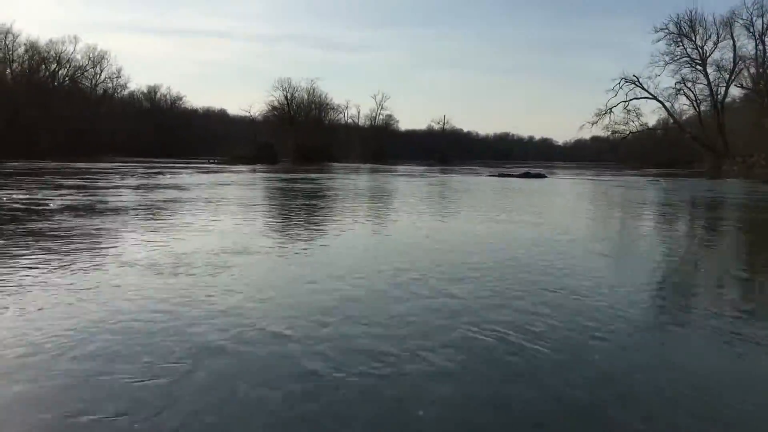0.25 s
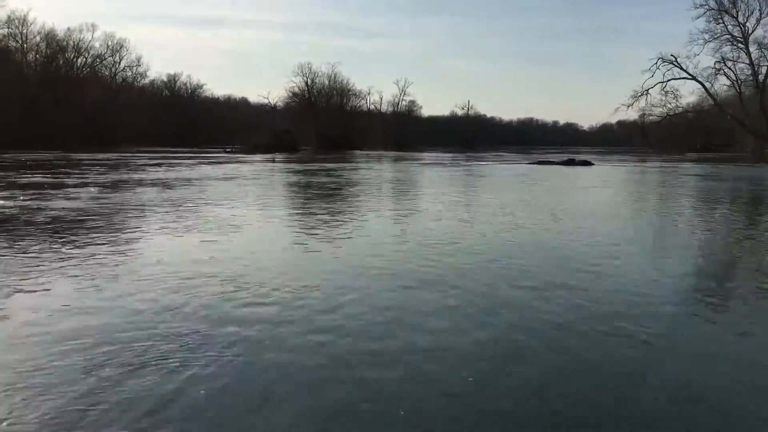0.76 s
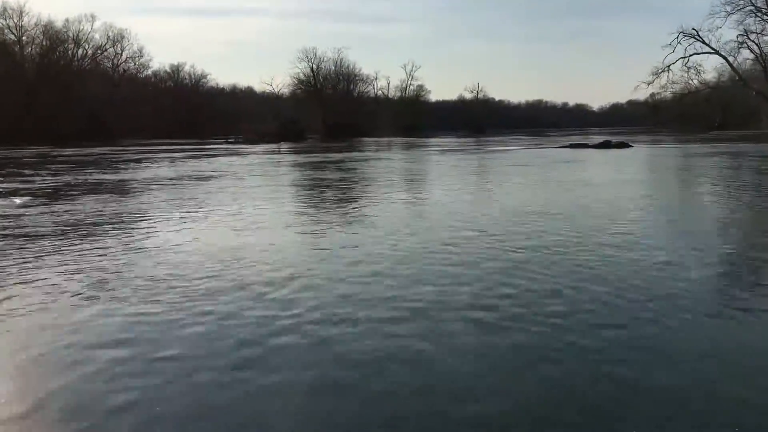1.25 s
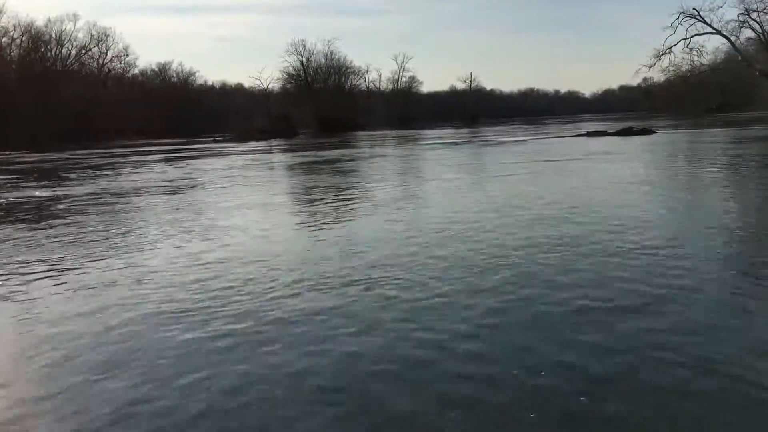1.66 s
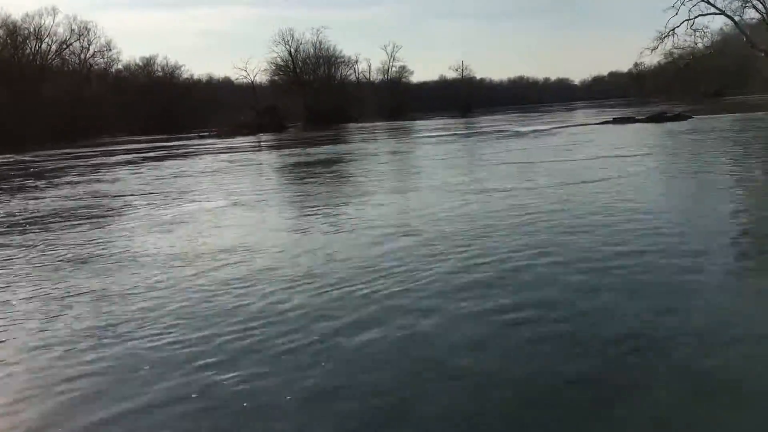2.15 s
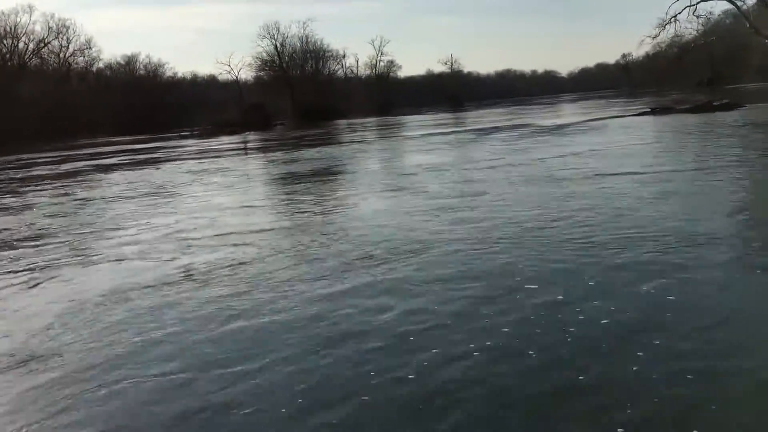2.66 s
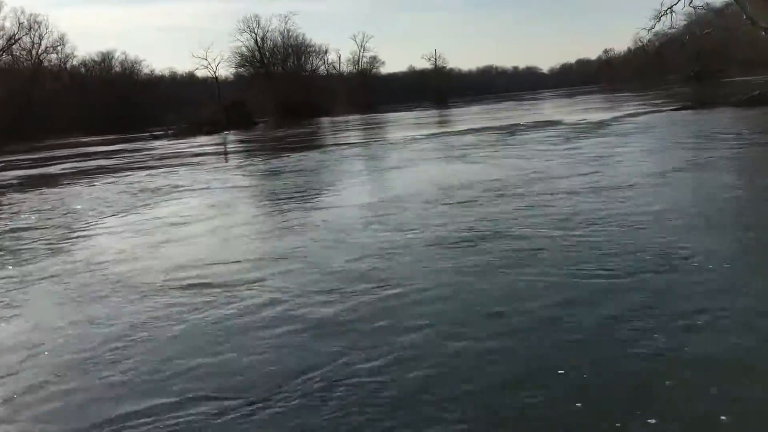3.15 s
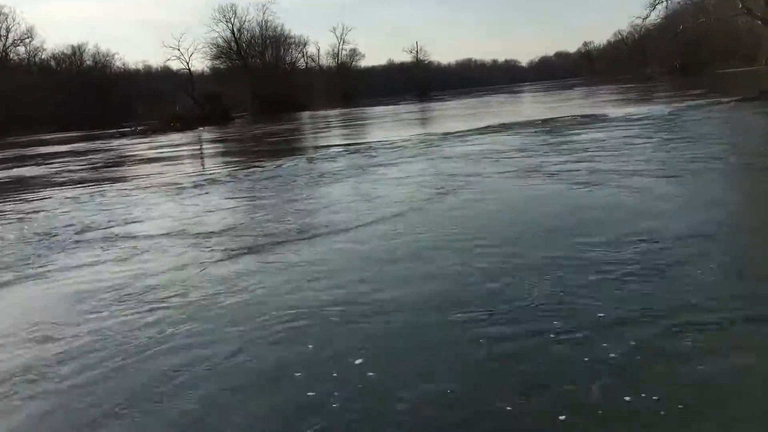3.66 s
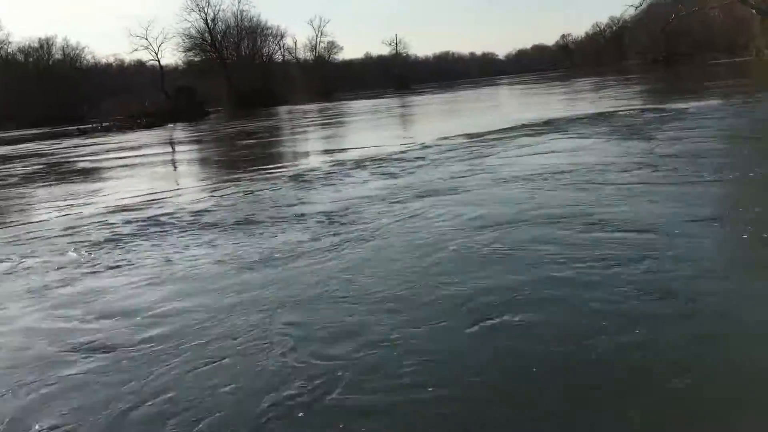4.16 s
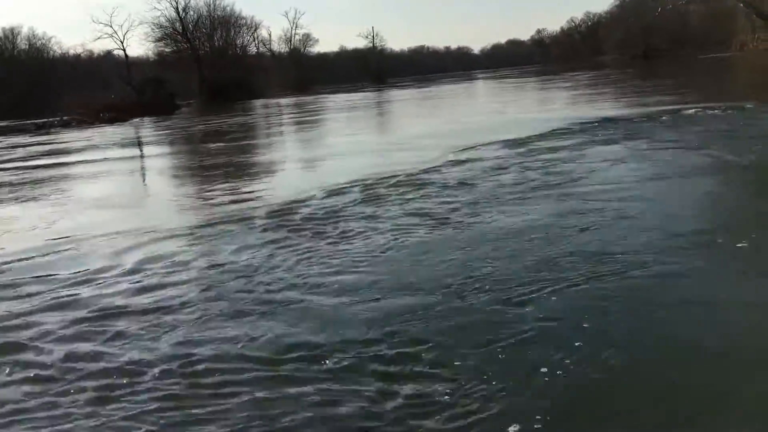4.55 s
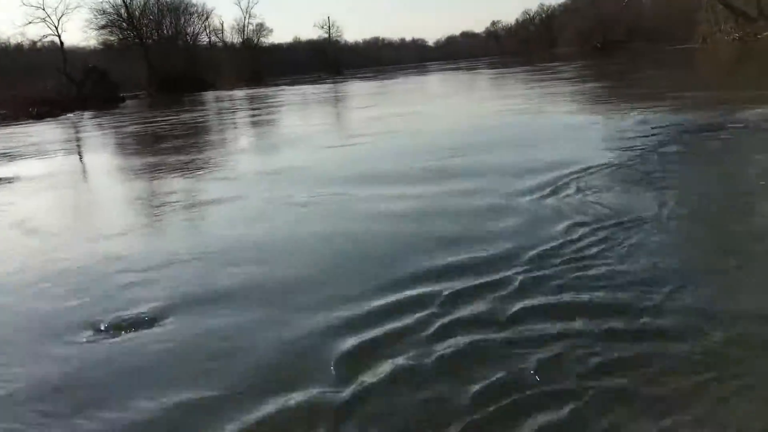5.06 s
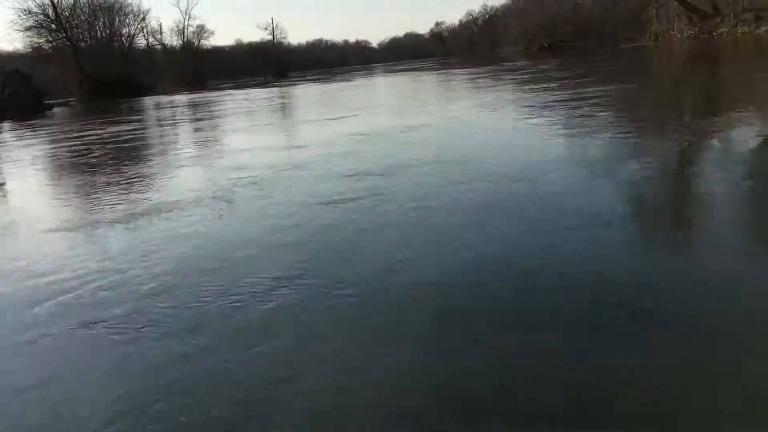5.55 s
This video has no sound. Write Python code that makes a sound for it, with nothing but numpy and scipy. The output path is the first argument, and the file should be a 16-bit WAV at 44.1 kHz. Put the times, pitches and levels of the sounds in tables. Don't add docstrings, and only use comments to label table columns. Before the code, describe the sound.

On board a jet boat cruising a calm, tree-lined river, a deep engine drone dominates throughout. At first wind rumbles on the microphone, chop knocks dully on the hull and spray hisses at its fullest. As the boat banks, the spray thins and faint engine tones swell and fade. After about five seconds the drone becomes steadier. Close, dry outdoor pick-up without echo.

```python
import sys
import numpy as np
from scipy import signal
from scipy.io import wavfile

SR = 44100
rng = np.random.default_rng(int(sys.argv[2]) if len(sys.argv) > 2 else 0)


def convert_level_to_amplitude(level_db):
    exponent = np.asarray(level_db, float) / 20
    return 10 ** exponent


def materialize(psi):
    bounded = np.clip(np.atleast_2d(psi).T, -1, 1)
    quanta = np.round(bounded * 32767).astype(np.int16)
    wavfile.write(sys.argv[1], SR, quanta)


N = 256212


def rms_one(x):
    return x / np.sqrt(np.mean(x ** 2) + 1e-20)


def in_time(rows):
    s, *columns = np.transpose(rows)
    return [np.interp(np.arange(N) / SR, s, c) for c in columns]


def swells(s, length_s, height):
    t = np.arange(0, N + 64, 64) / SR
    offset = (t[:, None] - s) / np.maximum(length_s, .005)
    bells = np.exp(-(2 * offset) ** 2) @ height
    return np.interp(np.arange(N) / SR, t, bells)


def drift(rate_hz):
    r = np.exp(-80 * np.pi * rate_hz / SR)
    coarse = rng.standard_normal(N // 40 + 2002)
    slow = signal.lfilter([1], [1, -2 * r, r * r], coarse)[2000:]
    return np.interp(np.arange(N) / 40, np.arange(len(slow)), rms_one(slow - slow.mean()))


def gusts(top_hz):
    low_pass = signal.butter(4, top_hz, fs=SR, output="sos")
    return rms_one(signal.sosfilt(low_pass, rng.standard_normal(N)))


def band_pass(x, low_hz, high_hz):
    return signal.sosfilt(signal.butter(2, [low_hz, high_hz], "band", fs=SR, output="sos"), x)


def banded_noise(spectrum, shared_db, patchy_db, rate_hz, tilt_db=0):
    hz, level_db = np.transpose(spectrum)
    edges = hz[0] * 2 ** np.arange(0, np.log2(hz[-1] / hz[0]) + .34, 1 / 3)
    out = 0
    together = drift(rate_hz)
    white = rng.standard_normal((2, N))
    for k, (low, high) in enumerate(zip(edges, edges[1:])):
        band = band_pass(white[k % 2], low, high)
        centre = np.sqrt(low * high)
        gain_db = np.interp(np.log(centre), np.log(hz), level_db) + tilt_db * np.log2(centre / 3000)
        out = out + convert_level_to_amplitude(gain_db + shared_db * together + patchy_db * drift(rate_hz)) * band
    return out


# (time [s], gustiness round the exhaust [dB], wind on the microphone [dB])
AIR = [(0, 4.5, 7), (.1, 0.5, 4.5), (.5, 2, 2), (1.0, 3, 0.5), (1.42, 6, 0), (1.6, 3, -1), (1.9, 4, -2),
       (2.0, -1, -3), (2.4, 0, 2), (2.6, -4.5, -4), (3.1, -4.5, 0.5), (3.3, -4, -1), (3.9, -2, 1),
       (4.6, -2, -2.5), (4.85, -0.5, 5), (5.5, -1.5, 4), (5.65, -3.5, -0.5), (5.81, 2, -1)]


def moving_air():
    return in_time(AIR)


# (time [s], length [s], jolt to the drone [dB], thud in the hull [dB])
CHOP = [(0.022, 0.13, 3, 15), (.22, 0.1, 4, 6), (0.398, .08, 3.5, 1), (.66, 0.3, 9, 1),
        (1.226, .12, 6.5, 1), (1.465, 0.12, 7.5, 0), (1.695, 0.046, 5, 4), (1.87, .1, 3.5, 2),
        (2.348, 0.23, 1, -3), (2.744, 0.33, 6, 5.5), (2.95, 0.11, 0, 3), (3.09, 0.11, 0, 7),
        (3.214, 0.19, 7, -3), (3.5, 0.28, 1.5, 7), (3.838, 0.087, 8.5, 9.5), (4.1, 0.1, 7, 9.5),
        (4.274, 0.17, 6, -9), (4.55, 0.18, 2.5, 3), (4.81, 0.18, 4, 6.5), (5.1, 0.055, 9, 2),
        (5.502, 0.12, 2, 4), (5.74, .06, 5, 5)]


def chop():
    s, length_s, jolt_db, thud_db = np.transpose(CHOP)
    return swells(s, length_s, jolt_db), swells(s, length_s, thud_db)


# (frequency [Hz], level [dB per Hz])
BUFFET = [(25, -18), (40, -6), (60, 5), (100, 1), (150, 5.5), (250, -6.5), (400, -15)]


def wind_buffet(wind_db):
    noise = banded_noise(BUFFET, shared_db=1.6, patchy_db=1.5, rate_hz=14.6)
    return convert_level_to_amplitude(-29.5 + wind_db) * rms_one(noise)


# (frequency [Hz], level [dB per Hz])
ROAR = [(400, -8), (480, -3), (600, 6), (750, 0.5), (950, -3), (1300, -8.5), (2000, -20.5)]
# (time [s], length [s], level [dB])
PUFFS = [
    (0.543, 0.084, 6),
    (.75, 0.045, 3),
    (0.84, .05, 6),
    (1.2, .1, -1),
    (1.69, .06, 3.5),
    (2.04, .08, 6.5),
    (2.33, 0.073, 2),
    (2.92, .08, 7),
    (3.95, 0.13, 2.5),
    (5.45, 0.17, 4),
]


def flow_roar(gust_db, jolt_db):
    level_db = -39.5 + gust_db + 0.078 * jolt_db + swells(*np.transpose(PUFFS))
    return convert_level_to_amplitude(level_db) * rms_one(banded_noise(ROAR, shared_db=1.6, patchy_db=0.9, rate_hz=12.5))


# (frequency [Hz], level [dB per Hz])
RUMBLE = [(230, -16), (290, 5.5), (350, 0.5), (420, -3.5), (520, -16)]


def hull_rumble(thud_db):
    noise = banded_noise(RUMBLE, shared_db=2.5, patchy_db=1.75, rate_hz=10.0)
    return convert_level_to_amplitude(-41.5 + thud_db) * rms_one(noise)


def upper_drone_noise(level_db, centre_hz, width_hz):
    b, a = signal.iirpeak(centre_hz, centre_hz / width_hz, fs=SR)
    once = signal.lfilter(b, a, rng.standard_normal(N))
    return convert_level_to_amplitude(level_db) * rms_one(signal.lfilter(b, a, once))


def random_sizes(spread_db):
    return convert_level_to_amplitude(spread_db * np.minimum(rng.exponential(1, N), 5)) * rng.choice([-1, 1], N)


def droplets(per_s, level_db):
    sizes = random_sizes(3.4)
    born = rng.random(N) < per_s * convert_level_to_amplitude(3.0 * drift(9)) / SR
    return convert_level_to_amplitude(level_db) * rms_one(band_pass(sizes * born, 7000, 15000))


def bubbles(per_s, level_db, cycles):
    sizes = random_sizes(2.9) * (rng.random(N) < per_s / SR)
    out = np.zeros(N)
    dealt = rng.integers(0, 40, N)
    for k, hz in enumerate(np.geomspace(450, 13000, 40)):
        r = convert_level_to_amplitude(-60 * hz / (cycles * SR))
        w = 2 * np.pi * hz / SR
        ring = signal.lfilter([np.sin(w)], [1, -2 * r * np.cos(w), r * r], sizes * (dealt == k) + 1e-18)
        out += convert_level_to_amplitude(-1.0 * np.log2(hz / 450)) * ring
    return convert_level_to_amplitude(level_db) * rms_one(out)


# (frequency [Hz], width [Hz], depth [-1 to 1])
NOTCHES = [(1510, 140, 0.16), (1674, 120, -0.35), (2900, 270, 0.31), (4890, 400, 0.37), (7630, 1060, 0.3),
           (10500, 660, 0.45)]


def reflections(x):
    for hz, width_hz, depth in NOTCHES:
        b, a = signal.iirpeak(hz, hz / width_hz, fs=SR)
        x = x - np.clip(depth, -1, 1) * signal.lfilter(b, a, x)
    return x


# (frequency [Hz], level [dB per Hz])
SPRAY = [(470, -36), (800, -4), (2910, -8.5), (4370, -11), (4890, -12), (5540, -12), (9210, -13.5),
         (10400, -15), (11800, -18), (15500, -21.5)]
# (time [s], level [dB])
WASH = [(0, 2), (.5, 2.5), (.75, 2.5), (1.05, 2), (1.25, 1.5), (1.6, 1), (2.0, -1), (2.7, -1.5), (3.3, -1),
        (3.7, -0.5), (4.8, -1), (5.15, -0.5), (5.4, -1.5), (5.7, 1.5), (5.81, 1)]
# (time [s], length [s], level [dB])
SPLASHES = [(.0, 0.02, 7.5), (.23, 0.037, 2), (0.997, 0.062, -2.5), (1.09, .03, 1.5), (1.26, .05, 1.5),
            (2.0, .04, -0.5), (2.69, .04, 1), (2.75, .03, -0.5), (2.96, .03, 1), (3.28, 0.046, -2),
            (3.573, .04, -1), (3.92, .03, -0.5), (4.11, .03, -0.5), (4.873, 0.047, -1.5), (5.09, .03, 0),
            (5.2, .04, 1.5), (5.398, .04, -0.5)]


def jet_and_spray(gust_db):
    t = np.arange(N) / SR
    wash_db = in_time(WASH)[0]
    splash_db = swells(*np.transpose(SPLASHES))
    brightening_db = .2 * (t - 2.9)
    tilt_db = 0.52 * wash_db + brightening_db - 0.12 * gust_db + 0.13 * splash_db
    hiss = rms_one(banded_noise(SPRAY, shared_db=.5, patchy_db=0.85, rate_hz=12.4, tilt_db=tilt_db))
    water = hiss + droplets(3000, level_db=-22.0) + bubbles(1500, level_db=-7, cycles=27)
    return convert_level_to_amplitude(-37 + 0.55 * wash_db + splash_db) * reflections(water)


def turbulence_level(gust_db, jolt_db):
    shelter_s, shelter_db_per_s = 5, 24
    sheltered_s = np.maximum(np.arange(N) / SR - shelter_s, 0)
    return -35 + 0.91 * gust_db + jolt_db - shelter_db_per_s * sheltered_s


# (middle time [s], length [s], multiple of the cycle rate [1], peak level [dB])
BLOOMS = [(0, 0.26, 3, -30), (.8, 0.38, 3, -43), (1.8, 0.47, 3, -34.5), (2.5, 0.97, 3, -36),
          (3.2, 0.72, 3, -31.5), (5.2, 1.2, 3, -30), (0.102, 0.72, 8, -40), (2.61, 0.74, 8, -37.5),
          (3.398, 0.58, 8, -40.5), (4.094, 0.37, 8, -40), (4.597, 0.86, 8, -45), (5.64, 0.46, 8, -38),
          (.2, 0.68, 12, -46), (1.0, 0.75, 12, -41), (2.1, 0.33, 12, -47), (3.345, 0.71, 12, -47),
          (4.3, 0.7, 12, -48.5), (5.7, .4, 12, -55), (1.3, 1.5, 16, -61), (2.35, 0.43, 16, -42),
          (5.1, .9, 16, -51.5)]


def blooms():
    s, length_s, order, peak_db = np.transpose(BLOOMS)
    order = np.round(order)
    levels = []
    for k in np.unique(order):
        height = convert_level_to_amplitude(-60) + swells(s, length_s, convert_level_to_amplitude(peak_db) * (order == k))
        levels.append((k, 20 * np.log10(height)))
    return levels


# (time [s], cycle rate [Hz])
ENGINE = [(0, 44.33), (.9, 44.29), (2.25, 44.26), (2.65, 44.13), (3.85, 44.11), (4.25, 43.98),
          (5.05, 43.89), (5.81, 43.9)]
# (multiple of the cycle rate [1], level [dB])
EXHAUST = [(2, -41.5), (6, -44.5), (7, -50), (13, -56), (14, -55.5), (15, -53), (17, -71), (24, -63),
           (28, -56.5)]
# (time [s], length [s], change of the drone [dB])
HEAVE = [(.0, 0.12, -4), (.61, 0.057, -5), (0.723, .06, -1.5), (.83, 0.076, 4), (0.888, 0.06, -2.5),
         (1.103, 0.044, -2), (1.18, 0.05, 1.5), (1.225, 0.033, -4), (1.33, .1, 2.5), (1.466, 0.046, -3),
         (1.52, .15, 1), (1.907, .1, -2), (1.98, 0.072, 3.5), (2.09, 0.11, -2), (3.98, .07, -1.5),
         (4.1, .12, 1.5), (4.42, .1, -0.5), (4.685, 0.13, -1.5), (5.12, .15, 1), (5.216, 0.067, -3),
         (0.525, .12, -1.5), (5.45, 0.21, -1.1)]


def exhaust(turbulence_db):
    turn = 2 * np.pi * np.cumsum(in_time(ENGINE)[0]) / SR
    shake = convert_level_to_amplitude(turbulence_db + 12.5)
    drone_level = convert_level_to_amplitude(-14 + swells(*np.transpose(HEAVE))) * (1 + shake * gusts(53.0))
    out = drone_level * np.sin(4 * turn + shake * gusts(76))
    for order, level_db in [*EXHAUST, *blooms()]:
        wobble = .4 * drift(5) + rng.uniform(0, 2 * np.pi)
        out += convert_level_to_amplitude(level_db - 2.5 + 2.5 * drift(7.2)) * np.sin(order * turn + wobble)
    return np.sqrt(2) * out


def scene():
    gust_db, wind_db = moving_air()
    jolt_db, thud_db = chop()
    turbulence_db = turbulence_level(gust_db, jolt_db)
    wind = wind_buffet(wind_db)
    hull = hull_rumble(thud_db) + flow_roar(gust_db, jolt_db)
    hull = hull + upper_drone_noise(turbulence_db - 2.5, centre_hz=208, width_hz=45)
    spray = jet_and_spray(gust_db)
    return (wind + hull + spray + exhaust(turbulence_db))[None]


def top_cut(x):
    return signal.sosfilt(signal.butter(12, 15760, fs=SR, output="sos"), x)


def record(dry):
    return top_cut(dry)


dry = scene()
out = record(dry)
materialize(out)
```